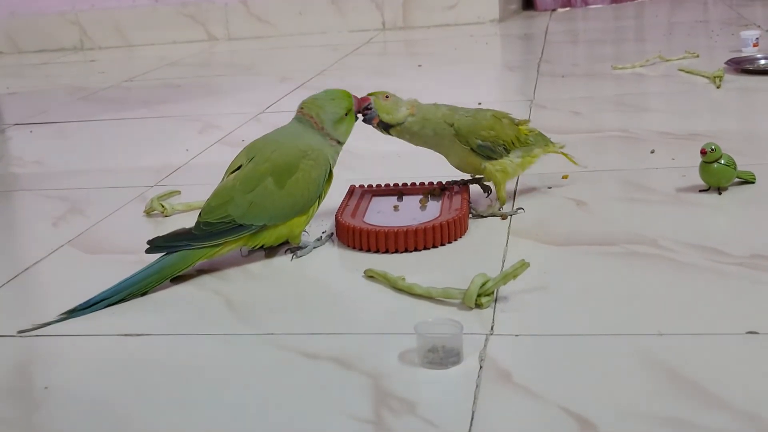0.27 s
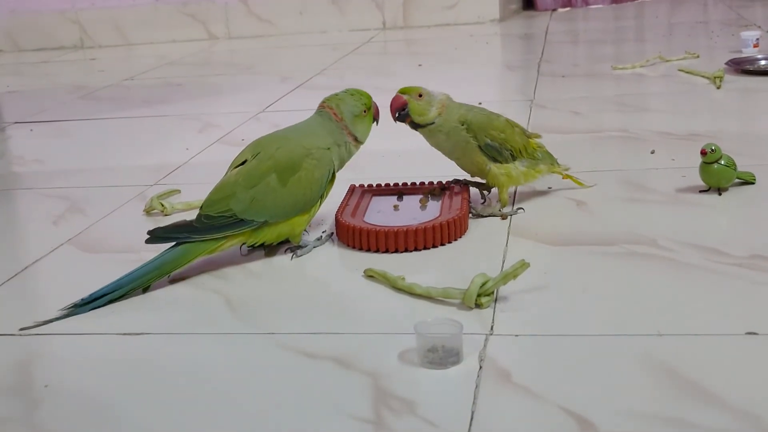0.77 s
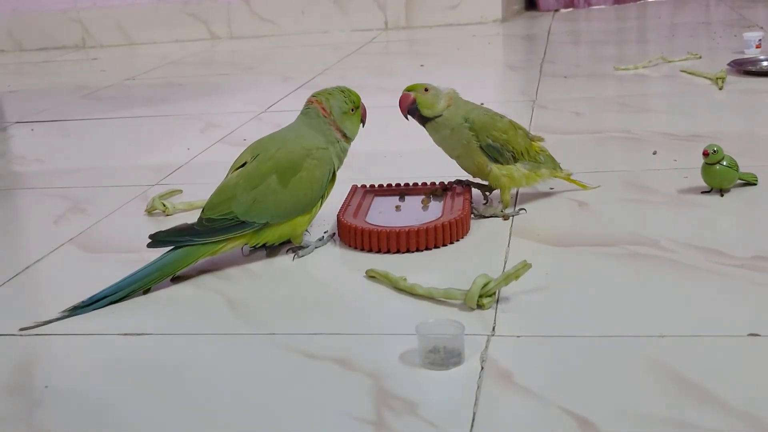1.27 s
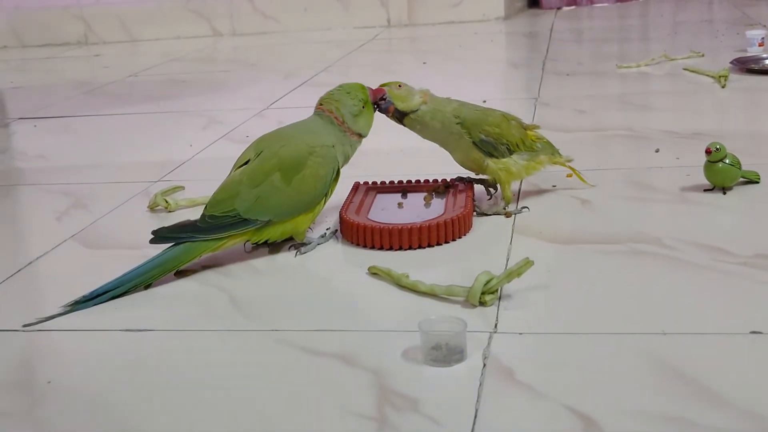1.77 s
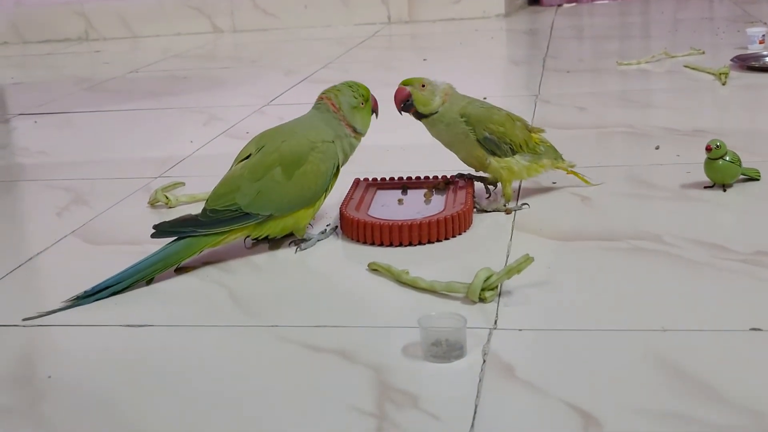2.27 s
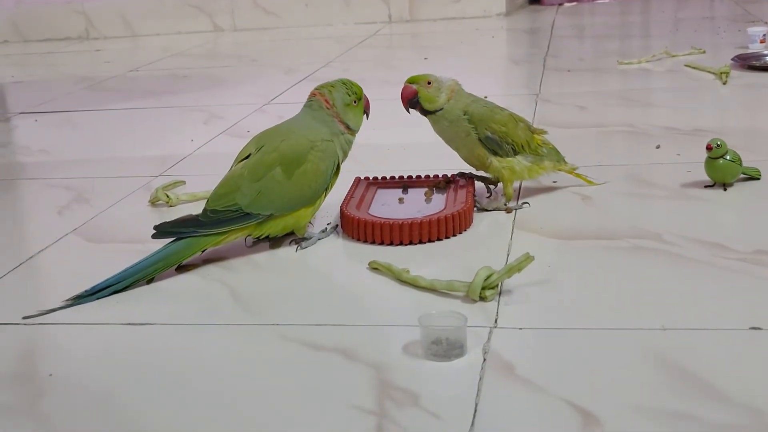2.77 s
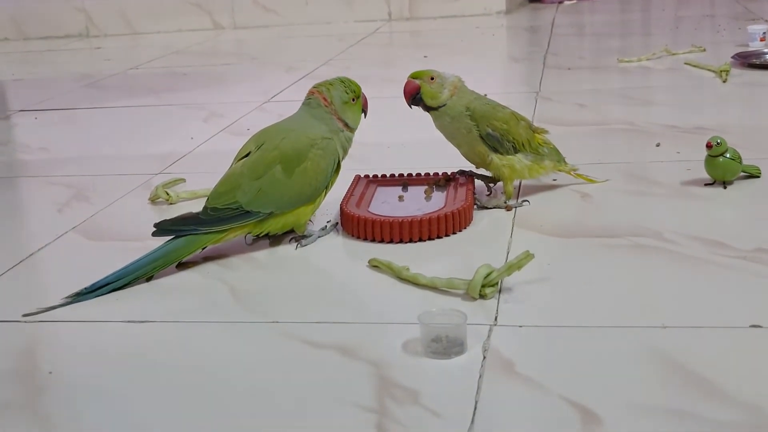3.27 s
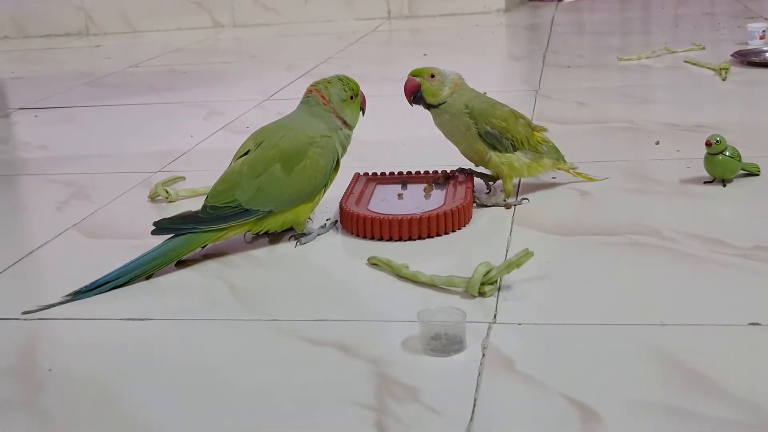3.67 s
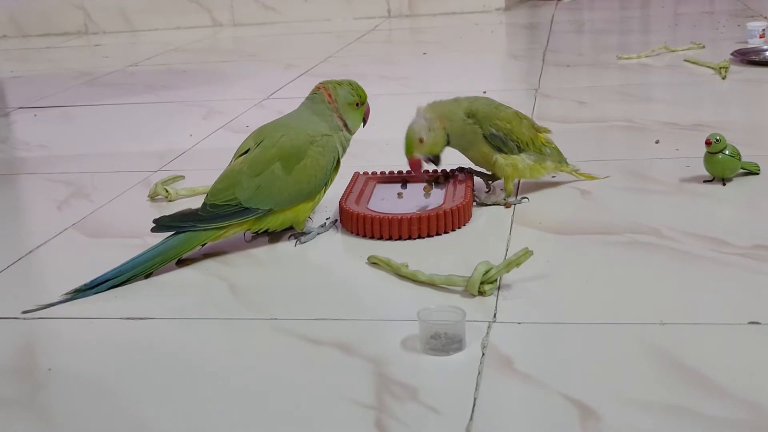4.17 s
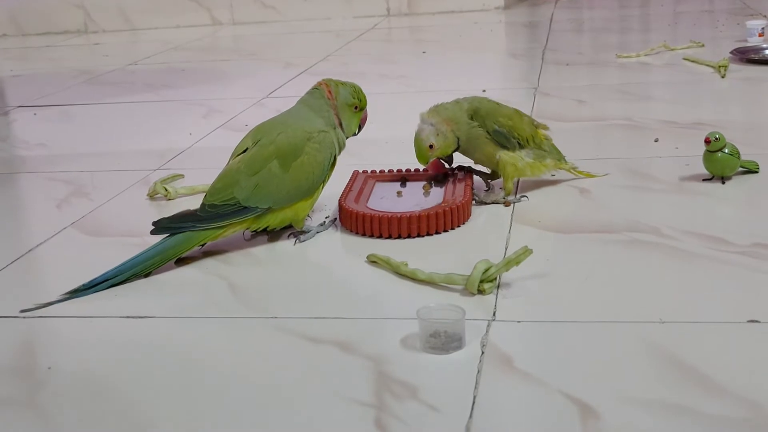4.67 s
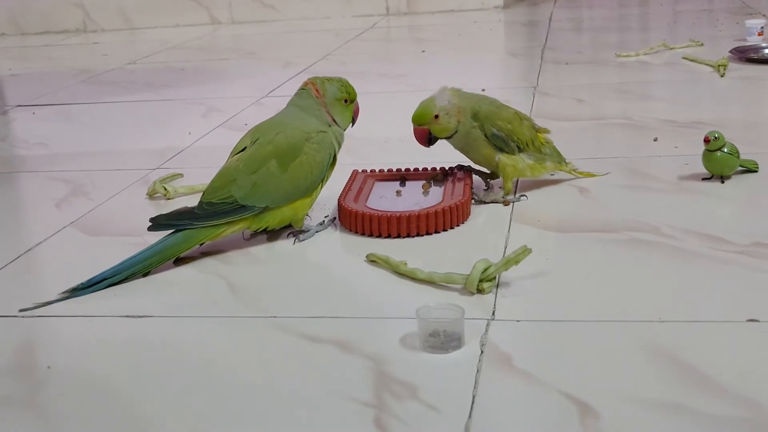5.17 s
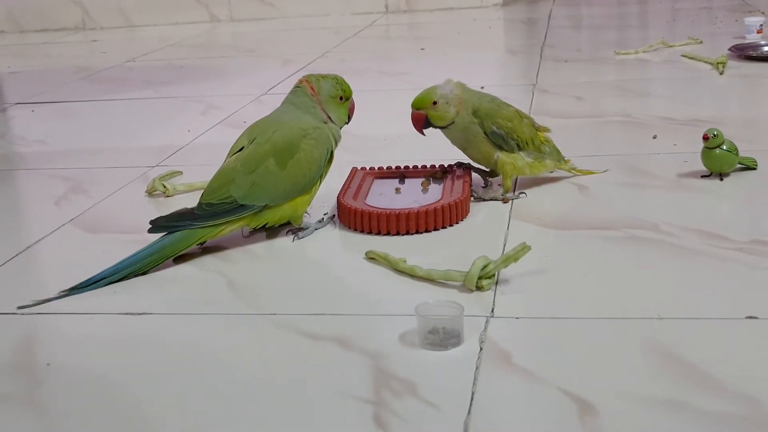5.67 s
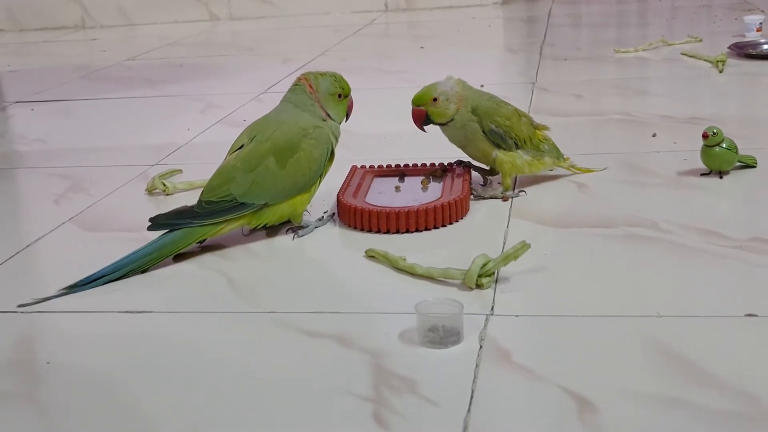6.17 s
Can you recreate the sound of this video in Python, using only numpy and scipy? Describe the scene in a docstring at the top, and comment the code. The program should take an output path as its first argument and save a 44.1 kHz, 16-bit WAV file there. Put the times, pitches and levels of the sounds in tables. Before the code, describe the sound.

Two parakeets call in a room with a hard tiled floor and a short echo, over a faint rush and low rumble. A soft ticking purr starts at about 0.2 seconds, swells into a small rising growl and becomes a clean mewing whistle near 0.9 seconds. The pattern repeats from 1.7 to 2.6 seconds, with a few soft clucks in the purr. Tiny dry beak ticks are scattered between 1 and 3.6 seconds. Three short, rough yelps come between 3 and 3.7 seconds. After a pause, a rattle grows from 4.3 seconds and leaps into a loud, harsh screech that ends near 4.9. A quick upward chirp leads into two loud, high squeals at about 5.3 and 5.6 seconds, each falling and turning rough. A last arched squawk with a trill in its middle runs from 5.8 to 6.2 seconds.

```python
"""Soft ticking purrs swell into mewing whistles; then come three yelps, a harsh screech and loud squawks.
Two parakeets are begging and calling at a food dish on the tiled floor of an echoing room.
Every call starts in the syrinx, a bird's voice box, as a tone with overtones, steady or chopped into
pulses, and is shaped by the throat and beak. Beaks tick now and then over a faint rush and rumble."""
import sys
import numpy as np
from scipy import signal
from scipy.fft import rfft, irfft, next_fast_len
from scipy.io import wavfile
from scipy.ndimage import uniform_filter1d, map_coordinates

SR = 44100
rng = np.random.default_rng(int(sys.argv[2]) if len(sys.argv) > 2 else 0)


def dump_mix(stems):
    """Bounce the given channels to the path in sys.argv[1] as a 16-bit WAV at rate SR."""
    frames = np.atleast_2d(stems).T  # one column per channel
    limited = np.clip(frames, -1, 1)  # hard clip at full scale
    pcm = np.round(limited * 32767).astype(np.int16)
    wavfile.write(sys.argv[1], SR, pcm)


N = 283563

# how throat and beak boost or weaken each frequency: f/Hz, gain/dB
THROAT_GAIN = [(200, -21), (550, -0.5), (900, 0.5), (1450, 0), (1900, 3.5), (2650, 9), (3450, 0),
               (4150, 9.5), (4700, 0), (5200, -1.5), (6100, 2), (7350, 4.5), (7900, -10.5), (8600, -34)]
# soft clucks that stand out of the purring: t/s, level/dB
CLUCK_EVENTS = [(.396, -47.5), (.489, -50), (.555, -45), (1.852, -48), (1.898, -41), (1.946, -40.5),
                (1.994, -39.5), (2.051, -42), (2.099, -39)]
TOP_HZ = 8750  # upper limit of the sound
SETTLE_S, CLOSE_S, SLACK_HZ = 0.015, 0.024, 390  # a note settles on its pitch, then drops as it closes


def amp(db):
    """Turn decibels into a gain."""
    return 10 ** (np.asarray(db) / 20)


def unit(x):
    """Scale to an average strength (rms) of 1."""
    return x / np.sqrt(np.mean(x ** 2) + 1e-20)


def along(points, hz):
    """Read between (frequency, value) points on a log frequency axis."""
    f, v = np.transpose(points)
    return np.interp(np.log(hz + 1), np.log(f + 1), v)


def clock(s, length):
    """The start sample of a call and the seconds since its start."""
    return round(s * SR), np.arange(round(length * SR)) / SR


def curves(rows):
    """Join timed rows with lines: start sample, scene time and a curve for each further column."""
    s, *columns = np.transpose(rows)
    start = round(s[0] * SR)
    t = np.arange(start, round(s[-1] * SR)) / SR
    return start, t, [np.interp(t, s, column) for column in columns]


def blend(first, last, share):
    """Go from first to last as share goes from 0 to 1."""
    return first + (last - first) * share


def bump(t, centre, width):
    """A rounded rise to 1 and back."""
    return np.exp(-((t - centre) / width) ** 2)


def wobble(rate, n):
    """A smooth curve of n samples through `rate` random points a second."""
    return map_coordinates(rng.standard_normal(4096), [np.arange(n) * rate / SR], mode="wrap")


def filtered(x, response):
    """Scale each frequency in x by response(hz)."""
    size = next_fast_len(N + SR // 2)
    return irfft(rfft(x, size) * response(np.fft.rfftfreq(size, 1 / SR)), size)[:N]


def noise(spectrum):
    """Noise of strength 1, coloured by (frequency, level) points."""
    return unit(filtered(rng.standard_normal(N), lambda hz: amp(along(spectrum, hz))))


def place(start, sound):
    """A silent track with one sound beginning at sample `start`."""
    track = np.zeros(N)
    track[start:start + len(sound)] = sound[:N - start]
    return track


def syrinx(pitch, bright_db, lift_db, rolloff_db, rasp):
    """The voice box sounds harmonics, whole multiples of its pitch; rasp smears them into noise."""
    n = len(pitch)
    harmonic = np.arange(1, 15)[:, None]
    hz = harmonic * pitch
    # bright_db tilts the treble, rolloff_db is lost per octave, lift_db goes to the second harmonic
    db = bright_db * (hz / 4000) ** 2 - rolloff_db * np.log2(harmonic) + lift_db * (harmonic == 2)
    gains = amp(np.where(hz < TOP_HZ, db, -np.inf))
    after_throat = gains * amp(along(THROAT_GAIN, hz))
    gains /= np.sqrt(np.sum(after_throat ** 2, axis=0) / 2)  # equally strong at any pitch
    gains *= np.clip((TOP_HZ - hz) / 600, 0, 1)  # harmonics fade as they glide out of range
    phase = 2 * np.pi * np.cumsum(hz, axis=1) / SR
    grit = np.array([wobble(1100, n) for _ in harmonic]) * rasp * np.sqrt(harmonic)
    edge_s = np.minimum(np.arange(n), np.arange(n)[::-1]) / SR
    return np.sum(gains * np.sin(phase + grit), axis=0) * np.minimum(edge_s / 0.0025, 1)


def closing(pitch, close_s):
    """The syrinx goes slack as a note ends: the dropping pitch, and the slackness from 0 to 1."""
    left_s = np.arange(len(pitch))[::-1] / SR
    slack = np.exp(-(left_s / close_s) ** 1.5)
    return blend(pitch, SLACK_HZ, slack), slack


def beak(tone, db, edge_hz=4920, shut_db=-40, open_db=-27.5):
    """The beak opens with effort; nearly shut on soft calls, it holds back the treble."""
    dull = signal.sosfiltfilt(signal.butter(5, edge_hz, fs=SR, output="sos"), tone)
    opening = np.clip((db - shut_db) / (open_db - shut_db), 0.05, 1)
    return blend(dull, tone, opening)


def pulsed_voice(pitch, db, bright_db, lift_db, pulse_hz, open_share, rasp):
    """The syrinx opens in uneven pulses, its pitch sagging within each."""
    n = len(pitch)
    cycles = np.cumsum(pulse_hz * np.exp(0.15 * wobble(90, n))) / SR
    within = np.minimum(cycles % 1 / open_share, 1)
    size, detune = rng.standard_normal((512, 2))[cycles.astype(int)].T  # one random pair per pulse
    arch = np.sin(np.pi * within)
    gate = unit(arch ** 2 * amp(1.3 * size) + 0.8 * open_share ** 4)  # wide pulses never quite close
    bend = 0.07 * np.sin(2 * np.pi * within) + 0.044 * detune * arch + 0.031 * wobble(900, n)
    tone = syrinx(pitch * np.exp(bend), bright_db, lift_db, rolloff_db=6.5, rasp=rasp)
    return amp(db) * gate * beak(tone, db)


def steady_voice(pitch, db, bright_db, lift_db, flutter):
    """An unbroken syrinx tone; flutter shakes its pitch and level and makes it rough."""
    n = len(pitch)
    trill_hz = 44 * (1 + 0.097 * wobble(30, n))
    trill = np.sin(2 * np.pi * np.cumsum(trill_hz) / SR)
    bend = flutter * (0.039 * trill + 0.029 * wobble(600, n)) + 0.001 * wobble(120, n)
    shimmer_db = flutter * 3.5 * wobble(270, n) + 1.2 * wobble(69, n)
    rasp = np.minimum(0.03 + flutter, 0.26)
    tone = syrinx(pitch * np.exp(bend), bright_db, lift_db, rolloff_db=8, rasp=rasp)
    return amp(db + shimmer_db) * tone


def hoarseness(voice, hiss_db):
    """Swirling air hisses more as the voice grows stronger."""
    strength = np.sqrt(np.abs(uniform_filter1d(voice ** 2, size=64)))
    return amp(hiss_db) * strength * np.minimum(strength / 0.23, 1) * rng.standard_normal(N)


def background():
    """A faint steady rush and an uneven low rumble in the house."""
    # tone colours of the rush and the rumble: f/Hz, relative level/dB
    rush_colour = [(150, -46), (300, -10.5), (480, -34.5), (580, -14), (750, 3), (1000, -5.5), (1300, -34),
                   (1700, -17.5), (2150, -8), (2600, -14), (3000, -44), (3900, -33), (5400, -63.5),
                   (7400, -22.5), (8500, -49.5), (11000, -81.5)]
    rumble_colour = [(15, -54), (25, -6.5), (43, -12.5), (87, 8), (124, -1), (214, 7), (267, -6.5),
                     (336, -32), (400, -8), (520, -50), (880, -120)]
    # swells of the rumble: t/s, half width/s, level/dB
    swells = [(.68, 0.031, -56.5), (1.45, 0.35, -69), (2.7, 0.3, -72), (5.75, 1, -70), (6.03, 0.048, -57)]
    t = np.arange(N) / SR
    swelling = sum(amp(db) * bump(t, s, width) for s, width, db in swells)
    rumble = (amp(-73.5) + swelling) * noise(rumble_colour)
    rush = amp(-61.5 + 0.25 * wobble(3.2, N)) * noise(rush_colour)
    return rumble + rush


def purrs(dip_s=0.012, fade_in_s=0.06):
    """Dull ticking that swells, brightens, slows and creeps up in pitch, dipping before each cluck."""
    # stretches of purring: t/s, length/s, first level/dB, last level/dB
    calls = [(0.216, .488, -58.5, -57.5), (1.716, .414, -59, -48.5)]
    out = np.zeros(N)
    for s, length, first_db, last_db in calls:
        start, t = clock(s, length)
        progress = t / length
        pitch = blend(746, 894, progress ** 2)
        dips = sum(bump(s + t, cluck_s - dip_s, dip_s) for cluck_s, _ in CLUCK_EVENTS)
        level = blend(first_db, last_db, progress) - 3 * (dips + np.exp(-t / fade_in_s))
        voice = pulsed_voice(pitch, level, bright_db=blend(-14.5, -13, progress), lift_db=-6.5,
                             pulse_hz=blend(80, 63, progress), open_share=0.79, rasp=0.27)
        out += place(start, voice)
    return out


def clucks(hz=836, length_s=0.0094):
    """Single rounded puffs of falling tone from a nearly closed beak."""
    out, n = np.zeros(N), int(length_s * SR)
    for s, db in CLUCK_EVENTS:
        pitch = hz * np.exp(0.049 * rng.standard_normal() + np.linspace(0.12, -0.12, n))
        tone = syrinx(pitch, bright_db=-28, lift_db=0.5, rolloff_db=14, rasp=0.22)
        out += place(round((s - 0.002) * SR), amp(db) * np.hanning(n) * tone)
    return out


def growls(first_hz=916, crest=0.47):
    """A pulsing note swells and fades while its pitch climbs and its pulses quicken."""
    # growls that the purrs break into: t/s, length/s, last pitch/Hz, level at the crest/dB
    calls = [(0.705, .127, 1383, -38), (2.13, .164, 1437, -37)]
    out = np.zeros(N)
    for s, length, last_hz, db in calls:
        start, t = clock(s, length)
        progress = t / length
        pitch = blend(first_hz, last_hz, progress ** 1.7)
        level = db - 9.5 * ((progress - crest) / (1 - crest)) ** 2
        voice = pulsed_voice(pitch, level, bright_db=-3.5, lift_db=-1.5,
                             pulse_hz=blend(33, 72, progress), open_share=0.946, rasp=0.043)
        out += place(start, voice)
    return out


def mews(sag_hz_per_s=520, fade_db_per_s=89.5):
    """Clean whistles scoop down onto their pitch, fade and dull as they sink, and get a last push."""
    # whistles: t/s, length/s, first pitch/Hz, settled pitch before sagging/Hz, base level/dB
    calls = [(.914, .196, 1445, 1338, -31), (2.358, .208, 1443, 1344, -28.5)]
    out = np.zeros(N)
    for s, length, first_hz, hz, db in calls:
        start, t = clock(s, length)
        onset = np.exp(-t / SETTLE_S)
        pitch, slack = closing(blend(hz, first_hz, onset) - sag_hz_per_s * t, CLOSE_S)
        push_db = 6.5 * bump(t, length - 0.047, 0.015)
        level = db - 11.5 * onset - fade_db_per_s * t + push_db - 4 * slack
        bright_db = -0.5 + 44 * np.log2(pitch / hz)
        out += place(start, steady_voice(pitch, level, bright_db, lift_db=2.5, flutter=0.04))
    return out


def beak_clicks(ring_s=0.025):
    """Tiny dry ticks of beaks on each other and on seed."""
    # beak taps: t/s, level/dB, f/Hz
    taps = [(1.111, -44.5, 7370), (1.241, -54, 7500), (1.402, -53.5, 6850), (1.647, -45, 1600),
            (2.137, -50, 7540), (2.569, -47.5, 7380), (2.69, -51, 7380), (2.843, -56.5, 6680),
            (3.508, -53.5, 7940), (3.551, -48, 6930)]
    out, t = np.zeros(N), np.arange(SR // 20) / SR
    attack = 1 - np.exp(-(t / 0.0004) ** 2)
    for s, db, hz in taps:
        ring = np.sin(2 * np.pi * hz * t + 0.29 * wobble(850, len(t)))
        out += place(round(s * SR), amp(db - 60 * t / ring_s) * ring * attack)
    return out


def slides():
    """Quick glides around the calls gather speed as the syrinx tightens or lets go."""
    # glides: t/s, length/s, first pitch/Hz, last pitch/Hz, first level/dB, last level/dB, brightness/dB
    calls = [(1.719, 0.011, 438, 410, -44.5, -50, -15), (2.839, .016, 750, 660, -37, -41, -7),
             (2.967, 0.048, 404, 1052, -42.5, -39.5, -19.5), (3.076, 0.039, 523, 635, -27, -62, 0.5),
             (3.209, .026, 470, 1285, -48.5, -46.5, -28), (3.547, 0.0088, 404, 530, -34, -52.5, 2),
             (5.208, .034, 422, 980, -46.5, -47.5, -13.5), (5.242, 0.017, 1050, 2210, -42.5, -21, 1.5),
             (5.259, .013, 2066, 2590, -18.5, -39.5, 1.5), (5.423, .048, 410, 1286, -49, -45, -30),
             (5.802, .047, 390, 1450, -50, -31, -2)]
    out = np.zeros(N)
    for s, length, first_hz, last_hz, first_db, last_db, bright_db in calls:
        start, t = clock(s, length)
        pitch = first_hz * (last_hz / first_hz) ** ((t / length) ** 1.2)
        level = np.linspace(first_db, last_db, len(t))
        out += place(start, steady_voice(pitch, level, bright_db, lift_db=5.5, flutter=0.049))
    return out


def yelps(sag_hz_per_s=1500, break_s=0.017):
    """A held note breaks, turning rough and weak; in the longer ones the pitch dips and rebounds."""
    # yelps: t/s, length/s, loud part/s, closing time/s, first pitch/Hz, settled pitch before sagging/Hz,
    # level/dB, brightness/dB, lift of the second harmonic/dB, depth of the pitch dip/share
    calls = [(3.049, .034, .028, 0.0079, 1362, 1430, -25.5, 1, 3, 0.22),
             (3.261, 0.13, 0.064, 0.021, 1594, 1599, -30, 3.5, -0.5, .46),
             (3.573, .152, .097, .022, 1333, 1567, -31, 2, 0.5, .45)]
    out = np.zeros(N)
    for s, length, loud_s, close_s, first_hz, hz, db, bright_db, lift_db, depth in calls:
        start, t = clock(s, length)
        onset = np.exp(-t / SETTLE_S)
        held_hz = blend(hz, first_hz, onset) - sag_hz_per_s * t
        dip = depth * bump(t, length - 0.057, 0.017)
        pitch, _ = closing(held_hz * (1 - dip), close_s)
        broken = np.clip((t - loud_s) / break_s + 1, 0, 1)
        weakened = np.clip((t - loud_s) / break_s, 0, 1)
        level = db - 8 * onset - 6.5 * weakened
        voice = steady_voice(pitch, level, bright_db, lift_db + 6 * broken, flutter=0.092 + 0.2 * broken)
        out += place(start, voice)
    return out


def screech(leap_at_s=4.535, leap_s=0.029, sag_at_s=4.68, sag_hz_per_s=1700):
    """A rattle leaps high, sags and closes; its pulses quicken and merge, and louder means brighter."""
    # loudness outline of the screech: t/s, relative level/dB
    outline = [(4.3, -60.5), (4.532, -26.5), (4.566, -22.5), (4.65, -18.5), (4.798, -18), (4.856, -17),
               (4.875, -23)]
    start, t, (db,) = curves(outline)
    high = 1 / (1 + np.exp((leap_at_s - t) / leap_s))
    sag_hz = sag_hz_per_s * np.maximum(t - sag_at_s, 0)
    pitch, slack = closing(blend(983, 2170, high) - sag_hz, CLOSE_S)
    level = db - 2.5 - 16 * slack
    effort_db = db - db.max()
    voice = pulsed_voice(pitch, level, bright_db=4.5 + 0.25 * effort_db, lift_db=9.5 + 0.43 * effort_db,
                         pulse_hz=blend(100, 210, np.linspace(0, 1, len(t)) ** 2),
                         open_share=blend(0.74, 1, amp(effort_db)), rasp=blend(0.55, 0.48, high))
    return place(start, voice)


def squeals(waver_hz=11.5, surge_s=0.015, fade_db_per_s=106):
    """A high held note surges as it breaks, then falls, roughens and fades."""
    # squeals: t/s, hold/s, fall/s, pitch/Hz, sag/(Hz per s), drop at the break/Hz,
    # added fall/(Hz per s), waver/share, held level/dB, level at the break/dB
    calls = [(5.326, .113, 0.11, 2391, 6, 189.6, 6065, .014, -22, -15),
             (5.563, .105, 0.13, 2355, 943, 49.3, 3716, 0.0018, -26.5, -15.5)]
    out = np.zeros(N)
    for s, hold_s, fall_s, hz, sag_rate, drop_hz, fall_rate, depth, held_db, break_db in calls:
        start, t = clock(s, hold_s + fall_s)
        since_break = np.maximum(t - hold_s, 0)
        surge = np.minimum(since_break / surge_s, 1)
        waver = depth * (1 - surge) * np.cos(2 * np.pi * waver_hz * t)
        pitch = hz * (1 + waver) - sag_rate * t - drop_hz * surge - fall_rate * since_break
        level = blend(held_db, break_db, surge) - fade_db_per_s * np.maximum(since_break - surge_s, 0)
        voice = steady_voice(pitch, level, bright_db=4.5, lift_db=blend(6.5, 11, surge),
                             flutter=blend(0.097, 0.18, surge))
        out += place(start, voice)
    return out


def squawk(trill_hz=44.04, trill_at_s=6.01, trill_width_s=0.077):
    """One long arched call that trills in its middle."""
    # outline of the last squawk: t/s, pitch/Hz, relative level/dB
    outline = [(5.85, 1457, -27.5), (5.864, 1615, -33.5), (5.892, 1288, -25), (5.906, 1422, -33),
               (5.952, 1494, -27), (6.04, 1571, -27), (6.09, 1456, -20), (6.18, 1132, -24),
               (6.2, 1070, -25)]
    start, t, (hz, db) = curves(outline)
    trilling = bump(t, trill_at_s, trill_width_s)
    trill = 0.05 * trilling * np.sin(2 * np.pi * trill_hz * t)
    pitch, slack = closing(hz * (1 + trill), close_s=0.02)
    level = db - 1.5 - 24 * slack
    voice = steady_voice(pitch, level, bright_db=4, lift_db=5.5, flutter=0.12 + 0.3 * trilling)
    return place(start, voice)


def room(x, early_db, tail_db):
    """Hard floor and walls add a few quick echoes, then a smooth fading tail."""
    # how long the room rings: f/Hz, time to fade by 60 dB/s
    ring_times = [(200, 0.35), (1000, 0.32), (2500, 0.41), (4000, 0.4), (8000, 0.38)]
    hz, t, bands = signal.stft(rng.standard_normal(SR), SR, nperseg=256)
    fade = amp(-60 * t / along(ring_times, hz)[:, None])
    _, tail = signal.istft(bands * fade, SR, nperseg=256)
    tail *= 1 - np.exp(-np.arange(len(tail)) / SR / 0.0067)  # the tail takes a moment to build
    early = np.zeros(len(tail))
    early[(rng.uniform(0.003, 0.028, size=8) * SR).astype(int)] = rng.choice([-1, 1], size=8)
    echoes = amp(tail_db) * tail / np.linalg.norm(tail) + amp(early_db) * early / np.linalg.norm(early)
    return x + signal.fftconvolve(x, echoes)[:N]


def scene():
    """The calls pass through the throat and ring in the room with the beak ticks, over the background."""
    tones = mews() + yelps() + slides() + squeals() + squawk()
    pulses = purrs() + growls() + screech()
    breath = hoarseness(tones, hiss_db=-22.5) + hoarseness(pulses, hiss_db=-5.5)
    voices = filtered(tones + pulses + breath + clucks(), lambda hz: amp(along(THROAT_GAIN, hz)))
    birds = voices + beak_clicks()
    return (room(birds, early_db=-6.5, tail_db=-4) + background())[None]


def record(dry):
    """Cut away all treble above TOP_HZ."""
    return filtered(dry[0], lambda hz: hz < TOP_HZ)[None]


dry = scene()
out = record(dry)
dump_mix(out)
```